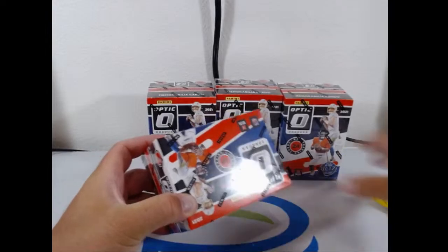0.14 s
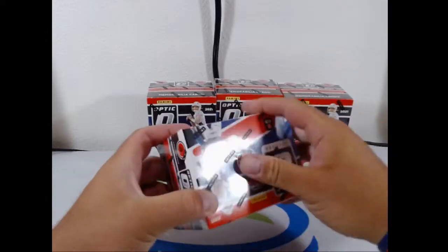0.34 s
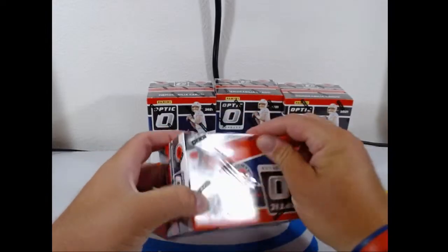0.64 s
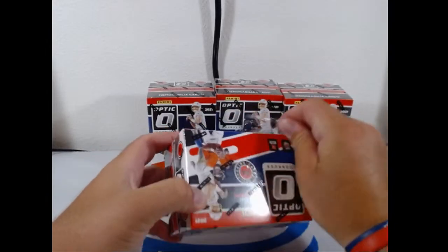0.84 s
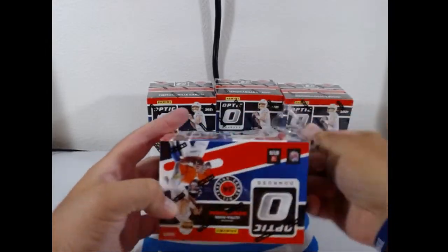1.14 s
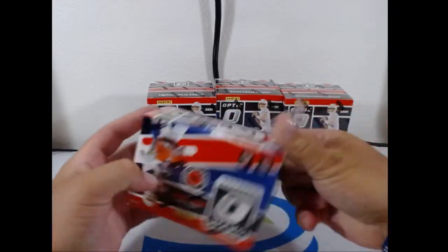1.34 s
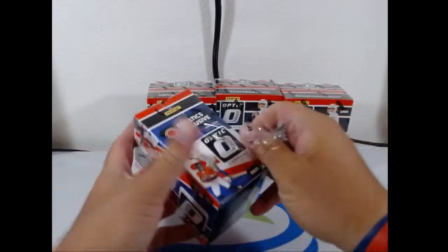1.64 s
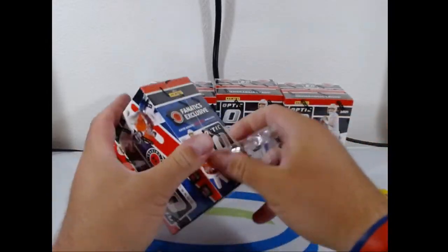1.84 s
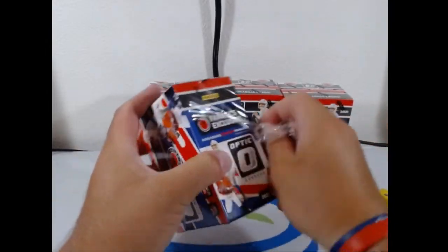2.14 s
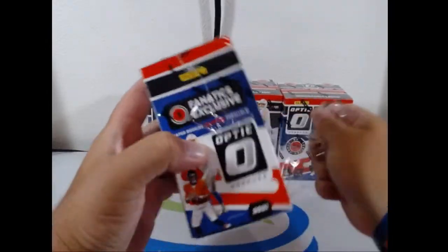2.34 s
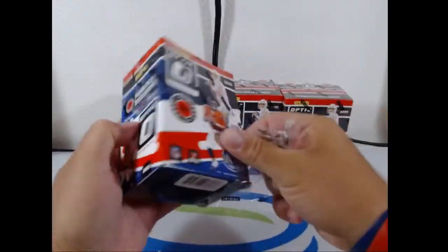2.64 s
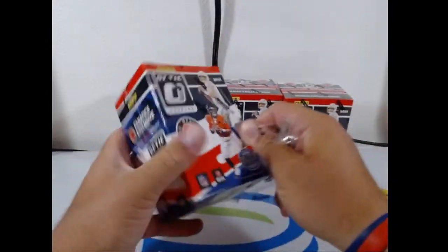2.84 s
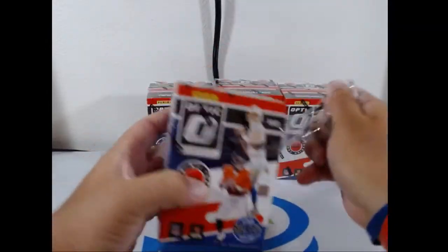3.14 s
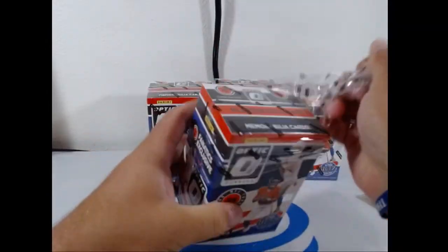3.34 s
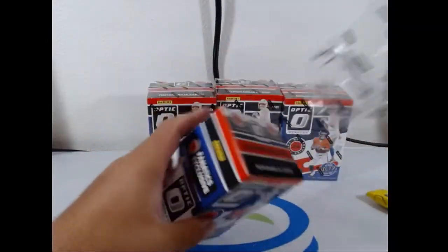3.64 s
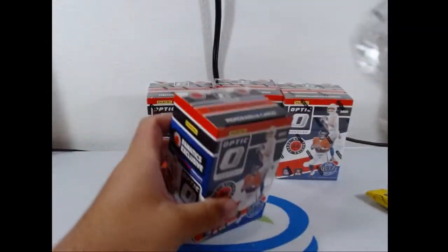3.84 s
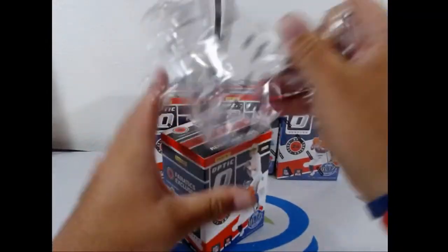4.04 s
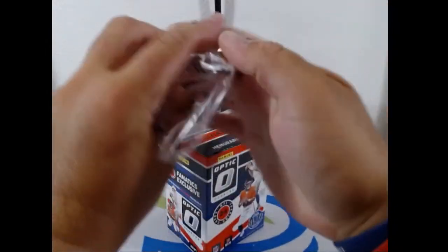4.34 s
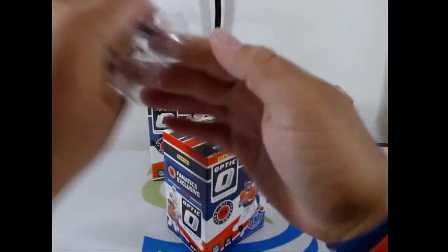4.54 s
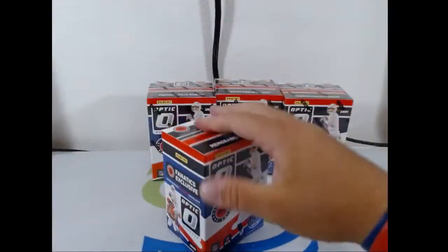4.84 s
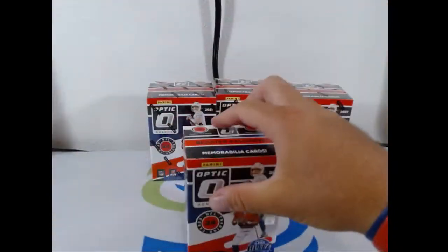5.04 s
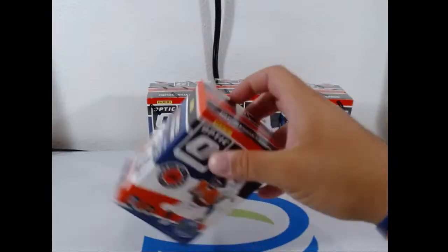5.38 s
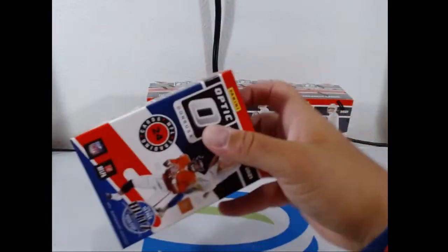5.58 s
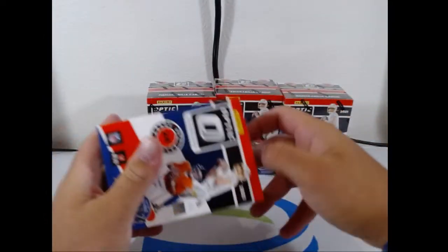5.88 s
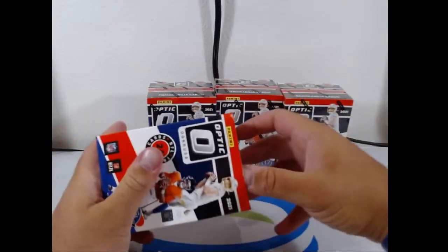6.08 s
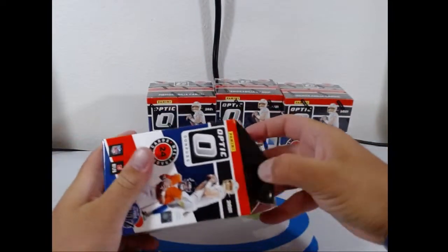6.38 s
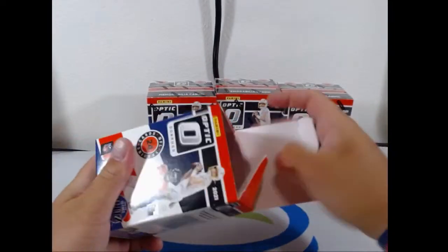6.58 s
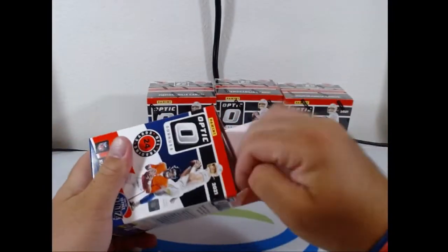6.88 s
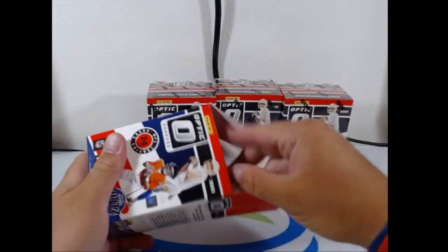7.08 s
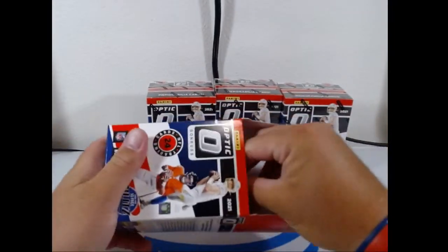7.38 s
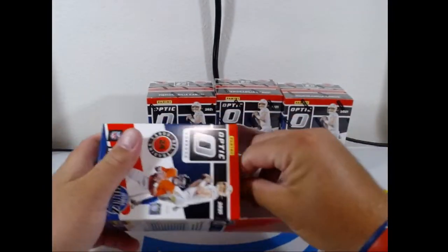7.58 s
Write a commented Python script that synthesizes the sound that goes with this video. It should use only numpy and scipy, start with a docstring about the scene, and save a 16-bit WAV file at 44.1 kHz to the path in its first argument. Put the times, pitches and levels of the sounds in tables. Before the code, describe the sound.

Close hands tear crackly wrap from a cardboard box, crumple it, set the box down and pull the flaps open with hollow knocks.

```python
"""Unwrapping a small cardboard box

Hands tear thin plastic wrap off a small cardboard box above a table, crumple it and open the flaps.
Film and card snap and crinkle: short noise bursts and thousands of tiny clicks, coloured by filters.
Fingers knock and brush the hollow box, and things land on the table: rough pushes and taps ring fading tones.
Mains hum and a wavering motor tone beat under the low rumble and faint hiss of the quiet room."""
import sys
import numpy as np
from scipy import signal
from scipy.fft import rfft, irfft
from scipy.io import wavfile
from scipy.ndimage import uniform_filter1d, map_coordinates

SR = 44100
rng = np.random.default_rng(int(sys.argv[2]) if len(sys.argv) > 2 else 0)


def persist_wave(psi):
    """Save psi, clipped to +-1, as 16-bit WAV."""
    counts = np.round(np.clip(psi, -1, 1) * 32767).astype(np.int16)
    wavfile.write(sys.argv[1], SR, np.atleast_2d(counts).T)


N = 340204  # length in samples


def gain_of(db):
    """Turns decibels into a gain."""
    return 10 ** (np.asarray(db) / 20)


def evened(x):
    """Scales a sound to an average (rms) strength of 1."""
    return x / np.sqrt(np.mean(x ** 2) + 1e-20)


def read(points, hz):
    """Reads a table of values by frequency, on a log-frequency axis."""
    f, value = np.transpose(points)
    return np.interp(np.log(hz + 1), np.log(f + 1), value)


def curve(rows, axis):
    """Draws one column of a timed table as a curve over all samples."""
    rows = np.array(rows)
    return np.interp(np.arange(N) / SR, rows[:, 0], rows[:, axis])


def add(mix, s, sound):
    """Mixes a sound in at a time in seconds."""
    part = mix[round(s * SR):][:len(sound)]
    part += sound[:len(part)]


def high_pass(x, hz, order=2):
    """Removes what lies below a frequency."""
    return signal.lfilter(*signal.butter(order, hz, "high", fs=SR), x)


def causal(db):
    """Makes a filter that answers at once (minimum phase) from dB gains on 1025 frequencies."""
    both_halves = np.r_[db, db[-2:0:-1]]
    log_gain = np.log(gain_of(np.maximum(both_halves, -100)))
    return np.fft.ifft(np.exp(np.conj(signal.hilbert(log_gain)))).real[:512]


def ring(modes, extra_db, sides=1, size=16000):
    """Sums the fading tones (modes) of a struck body; sides of +1 or -1 start each outward or inward."""
    t = np.arange(size) / SR
    hz, level_db, t60 = np.array(modes).T[:, :, None]
    fading = gain_of(level_db + extra_db[:, None] - 60 * t / t60)
    return np.dot(sides * np.ones(len(modes)), fading * np.sin(2 * np.pi * hz * t))


def sparse(per_s, spread_db):
    """Scatters random clicks of either sign, a few of them large."""
    size = gain_of(spread_db * np.minimum(rng.exponential(1, N), 4))
    size = size * rng.choice([-1., 1.], N)
    return size * (rng.random(N) < per_s / SR)


def drift(size):
    """Slow random wandering: noise smoothed twice over a number of samples."""
    smooth = uniform_filter1d(rng.standard_normal(N), size=size)
    return evened(uniform_filter1d(smooth, size=size))


def alike(first, other, hz):
    """Makes a second side that shares part of the first, by frequency as in the room air."""
    same = read(SAME, hz)[:, None]
    return np.array([first, same * first + np.sqrt(1 - same ** 2) * other])


# Steady hum tones. Each row: pitch in Hz, rms level in dB.
HUM_TONES = [(120.04, -45.5), (330, -67)]
MOTOR_HZ, MOTOR_WIDTH_HZ, MOTOR_DB = 114.9, 1.3, -47  # centre, width of the fuzz, rms level


def hum():
    """Steady hum tones and a fuzzy motor tone close below the lowest, so the two beat unevenly."""
    t = np.arange(N) / SR
    mains = sum(gain_of(db) * np.sin(2 * np.pi * hz * t) for hz, db in HUM_TONES)
    r = np.exp(-np.pi * MOTOR_WIDTH_HZ / SR)
    noise = rng.standard_normal(N) + 1j * rng.standard_normal(N)
    waver = signal.lfilter([1 - r], [1, -r], noise)
    motor = evened((waver * np.exp(2j * np.pi * MOTOR_HZ * t)).real)
    return np.sqrt(2) * mains + gain_of(MOTOR_DB) * motor


# Colour of the room air. Each row: frequency in Hz, relative level in dB per Hz.
AIR = [(12, -34.5), (25, 10), (60, -2.5), (105, -5), (160, -7.5), (230, -12.5), (300, -18), (400, -27.5),
       (1360, -32.5), (2300, -39.5), (6900, -54.5), (8400, -61), (9500, -104)]
AIR_DB = -49  # overall rms level
# Likeness of left and right. Each row: frequency in Hz, likeness from 0 (unrelated) to 1 (equal).
SAME = [(60, 1), (800, 0.89), (1500, 0.38), (4000, 0.2), (8000, 0.62)]


def air():
    """Low rumble and faint hiss of the room: noise shaped by frequency, partly shared by both sides."""
    frames, hz = N // 512 + 5, np.fft.rfftfreq(2048, 1 / SR)
    a, b, c, d = rng.standard_normal((frames, 1025, 4)).T
    spectra = alike(a + 1j * b, c + 1j * d, hz) * gain_of(read(AIR, hz))[:, None]
    noise = signal.istft(spectra, nperseg=2048, noverlap=1536)[1][:, :N]
    return gain_of(AIR_DB) * evened(noise)


# How fast the room dies away. Each row: frequency in Hz, time to fall 60 dB in seconds.
ROOM = [(200, 0.29), (1000, 0.2), (4000, 0.074), (8000, 0.12)]


def room(x):
    """Sparse reflections of random sign, the bass shared by both sides, each band dying at its own speed."""
    taps = np.zeros((2, SR // 2))
    slots = np.arange(60, SR // 2 - 20, 20)
    at = slots + rng.integers(0, 20, (2, len(slots)))
    np.put_along_axis(taps, at, rng.choice([-1., 1.], at.shape), 1)
    hz, t, z = signal.stft(taps, SR, nperseg=256)
    fading = gain_of(-60 * t / read(ROOM, hz)[:, None])
    tail = signal.istft(alike(z[0], z[1], hz) * fading, SR, nperseg=256)[1]
    return signal.fftconvolve(x[None], tail / np.linalg.norm(tail[0]), axes=1)[:, :N]


def nearby(x, size=1024):
    """Moving hands and box throw the treble back within milliseconds, differently at each side and moment."""
    treble = high_pass(x, 1150., order=4)
    out, fade = np.zeros((2, N + 2 * size)), signal.windows.hann(size, sym=False)
    for start in range(0, N - size // 2, size // 2):  # overlapping moments
        taps = np.zeros((2, 256))
        np.put_along_axis(taps, rng.integers(10, 256, (2, 10)), rng.choice([-1., 1.], (2, 10)), 1)
        taps *= np.exp(-np.arange(256) / 60.0)
        taps /= np.linalg.norm(taps, axis=1)[:, None]
        part = treble[start:start + size]
        echo = signal.fftconvolve((part * fade[:len(part)])[None], taps, axes=1)
        out[:, start:start + echo.shape[1]] += echo
    return out[:, :N]


# Pulls, squeezes and slides of the hands.
# Each row: start in seconds, length in seconds, crinkle level in dB, level of the box walls in dB.
STROKES = [(0.075, 0.062, -55, -49.5), (0.359, 0.026, -64.5, -45.5), (0.473, 0.03, -70, -56),
           (0.565, 0.0077, -63, -51.5), (0.636, 0.1, -59, -55), (0.863, 0.14, -58, -69),
           (1.015, 0.051, -55.5, -44), (1.097, 0.22, -56, -55), (1.418, 0.089, -53.5, -45),
           (1.625, 0.034, -66, -50), (1.726, 0.097, -59.5, -48.5), (1.89, 0.15, -63, -52.5),
           (2.146, 0.045, -51, -45.5), (2.29, 0.13, -55.5, -44), (2.614, 0.029, -65, -51),
           (2.694, 0.021, -57, -43.5), (3.021, 0.11, -49, -44), (3.264, 0.017, -58, -54.5),
           (3.426, 0.12, -58, -50.5), (3.591, 0.011, -41.5, -35), (3.654, 0.063, -56, -53),
           (4.011, 0.092, -68, -42), (4.175, 0.011, -54.5, -51), (4.275, 0.12, -51.5, -55.5),
           (4.486, 0.091, -51.5, -56), (4.633, 0.052, -64, -66), (4.845, 0.015, -56.5, -62),
           (4.888, 0.055, -74, -49.5), (5.059, 0.018, -64, -48), (5.3, 0.02, -65.5, -44.5),
           (5.738, 0.12, -67, -52), (6.033, 0.035, -65.5, -77), (6.086, 0.012, -56, -45.5),
           (6.314, 0.026, -66, -41.5), (6.393, 0.0099, -39.5, -32), (6.449, 0.041, -43, -38),
           (6.524, 0.017, -43, -39), (6.637, 0.13, -62, -55), (6.884, 0.078, -55, -46),
           (7.051, 0.041, -50.5, -48.5), (7.153, 0.17, -54.5, -43), (7.368, 0.059, -59, -62),
           (7.565, 0.25, -50, -40.5)]
# Faint rustle between the strokes.
# Each row: time in seconds, crinkle level in dB, level of the box walls in dB.
REST = [(0, -69, -53), (.3, -73.5, -65.5), (.9, -69, -58.5), (2.5, -65.5, -62), (2.9, -62, -56.5),
        (3.9, -64.5, -59.5), (4.8, -61, -72.5), (5.3, -73, -51.5), (5.5, -87.5, -78), (5.95, -74.5, -58),
        (6.8, -87, -64), (7.71, -62.5, -45)]
RISE_DB_PER_S, SAG_DB_PER_S, FALL_DB_PER_S = 610, 17, 259.5  # before, during and after a stroke


def handling(axis):
    """Level gain from the hands: each stroke rises, sags while held and falls, over the faint rustle."""
    t = np.arange(N // 64 + 2) * 64 / SR  # every 64 samples is fine enough
    rows = np.array(STROKES)
    since, length = t - rows[:, :1], rows[:, 1:2]
    db = rows[:, axis + 1, None] + RISE_DB_PER_S * np.minimum(since, 0)
    db = db - SAG_DB_PER_S * np.clip(since, 0, length)
    db = db - FALL_DB_PER_S * np.maximum(since - length, 0)
    power = np.interp(np.arange(N) / SR, t, (gain_of(db) ** 2).sum(0))
    return np.sqrt(power + gain_of(curve(REST, axis=axis)) ** 2)


# Tones of the hollow box. Each row: pitch in Hz, relative level in dB, time to fall 60 dB in seconds.
BOX = [(199.6, -5, 0.08), (245.5, 7.5, 0.025), (330.7, 0.5, 0.043), (403.4, -6.5, 0.075), (472, 1, 0.024),
       (517.2, -9.5, 0.083), (692, 2.5, 0.024), (782, 1.5, 0.036), (880, -5.5, 0.024), (880, -6, 0.048),
       (1007, -3.5, 0.034), (1230, -9.5, 0.011), (1540, -5, 0.014), (1950, -3.5, 0.0068),
       (2880, -10, 0.016)]


def walls():
    """Fingers sliding and film tugging tap the box walls many times a second."""
    out = np.zeros(N)
    tilt_db = 1.1 * np.log2(np.array(BOX)[:, 0] / 500)
    for spot, sides in rng.standard_normal((5, 2, len(BOX))):  # each spot on the walls favours other modes
        body = ring(BOX, tilt_db + 4.6 * spot, np.sign(sides), size=5000)
        out += signal.oaconvolve(sparse(per_s=290.0, spread_db=5.5), evened(body))[:N]
    return handling(axis=2) * evened(high_pass(out, 200.))


SETTLE_DB_PER_S = 895  # extra fade, by at most 16 dB, once the object rests and damps the ring


def blows(rows, modes, below, scatter_db, grit, even, scattered):
    """A short rough contact rings the modes near its centre most; where it lands varies each mode."""
    out, t = np.zeros(N), np.arange(1500) / SR
    mode_hz = np.array(modes)[:, :1]
    draws = rng.standard_normal((len(rows), len(t) + len(modes)))
    for (s, db, centre_hz, ms, *rest), draw in zip(rows, draws):
        width = rest[0] if rest else 0.62 * (736.0 / centre_hz) ** 0.45  # high taps ring few modes
        apart = np.log(mode_hz[:, 0] / centre_hz)
        near_db = -12.0 * (apart / np.where(apart < 0, below * width, width)) ** 2
        u = t * 1000 / max(ms, .2)
        push = u * np.exp(-2.5 * u) * (1 + grit * draw[:len(t)])
        reach = abs(np.exp(-2j * np.pi * mode_hz * t) @ push)  # how hard the contact drives each mode
        # even lessens how much the contact's own chance colours the ring
        near_db = np.maximum(near_db, -30.) - even * 20 * np.log10(reach / reach.max() + 0.011)
        sides = np.sign(draw[-len(modes) - 100:-100]) if scattered else 1
        body = ring(modes, near_db + scatter_db * draw[len(t):], sides)
        sound = signal.fftconvolve(push, body)
        sound = high_pass(sound, centre_hz * 0.37)  # a small body radiates no deep bass
        if rest:
            late = np.maximum(np.arange(len(sound)) / SR - rest[1] / 1000, 0)
            sound = sound * gain_of(np.maximum(-SETTLE_DB_PER_S * late, -16.))
        add(out, s, gain_of(db) * sound / abs(sound).max())
    return out


# Things set down on the table, first a tool, then the box.
# Each row: start in seconds, peak level in dB before the room and microphones,
# centre of the excited modes in Hz, time scale of the contact in ms,
# spread of the excited modes in log frequency, time in ms after which the ring is damped.
LANDINGS = [(.039, 1, 299, 0.9, 0.53, 240), (.046, -8.5, 106.5, 0.57, 0.65, 45.),
            (3.994, -10, 252, 0.83, 0.24, 34.), (4.070, -18.5, 254, 2.7, 0.31, 29),
            (4.892, -19.5, 255, 1.3, 0.27, 30)]
# Tones of the table top. Each row: pitch in Hz, relative level in dB, time to fall 60 dB in seconds.
TABLE = [(81, -9, 0.16), (119, -1.5, 0.16), (252.3, 0, 0.22), (266.2, 1.5, 0.2), (312, -6.5, 0.18),
         (331, 9.5, 0.055), (333, -15, 0.85), (380, 2.5, 0.051), (494, -13.5, 0.51), (770, -3, .05),
         (960, 10.5, 0.045), (1265, -7.5, 0.44), (1757, 4.5, 0.076)]


def landings():
    """Objects set down ring the table top, then damp it as they rest."""
    return blows(LANDINGS, TABLE, below=0.84, scatter_db=1.2, grit=0.8, even=1.0, scattered=False)


# Knocks on the box. Each row: start in seconds, peak level in dB before the room and microphones,
# centre of the excited modes in Hz, time scale of the contact in ms.
KNOCKS = [(0.043, -16.5, 910, 6.5), (0.326, -27.5, 760, 1.35), (0.336, -35, 750, 4),
          (0.371, -22.5, 640, 4.1), (0.396, -31.5, 420, 3.6), (0.445, -33, 630, 3), (0.608, -27, 664, 3.5),
          (0.908, -29.5, 850, 1.7), (0.976, -29, 396, 0.33), (1.042, -35, 790, 2.4),
          (1.054, -24, 590, 1.86), (1.094, -22.5, 640, 2.9), (1.149, -31, 850, 1.4),
          (1.403, -29.5, 443, 10), (1.445, -35, 820, 5.8), (1.647, -28, 750, 2.5), (2.162, -29.5, 706, 0.7),
          (2.238, -22, 526, 3.4), (2.247, -28, 620, 5.8), (2.343, -36, 810, 2.27), (2.608, -25.5, 386, 2.2),
          (2.648, -28, 484, 1.5), (2.973, -29, 411, 1.6), (3.024, -18.5, 375, 5.2),
          (3.088, -28.5, 860, 4.1), (3.245, -43, 780, 1.3), (3.275, -33, 464, 1.7), (3.45, -21, 463, 1.8),
          (3.587, -25.5, 433, 1.5), (3.61, -21, 453, 1.5), (3.706, -29.5, 455, 6.1), (3.999, -16, 745, 3.1),
          (4.016, -34, 780, 2.4), (4.885, -29, 620, 2.4), (4.926, -31.5, 760, 1.8),
          (5.011, -41.5, 835, 3.4), (5.056, -33.5, 640, 2.6), (5.057, -42, 2010, 3.5),
          (5.335, -44.5, 1850, 10.2), (5.264, -31.5, 710, 5), (5.271, -36, 2910, 1.7),
          (5.306, -31, 706, 1.3), (5.735, -34, 306, 1.4), (5.776, -27.5, 543, 2.6), (5.929, -37, 451, 6.2),
          (6.0765, -12, 516, 2.05), (6.164, -32, 497, 3.6), (6.299, -15.5, 516, 4.9),
          (6.383, -19, 516, 4.2), (6.41, -25.5, 480, 2.3), (6.449, -10.5, 570, 5.2), (6.545, -16, 400, 5.3),
          (6.644, -35, 690, 2.5), (6.762, -35, 443, 10.5), (6.974, -28.5, 855, 6.6), (7.131, -29, 428, 4.8),
          (7.166, -14.5, 635, 4.8), (7.187, -23, 240, 4.1), (7.251, -30, 980, 2.7), (7.274, -25, 463, 11),
          (7.368, -27.5, 935, 1.5), (7.382, -28.5, 1020, 4.9), (7.547, -36, 950, 2.8),
          (7.565, -16.5, 400, 8.4), (7.624, -24, 850, 4.2)]


def knocks():
    """Fingers knock the hollow box, and its walls ring outward or inward by chance."""
    return blows(KNOCKS, BOX, below=1.11, scatter_db=2.0, grit=3.23, even=0.88, scattered=True)


# Colour of the film. Each row: frequency in Hz, relative level in dB.
FILM = [(200, -23.5), (600, -5), (1200, -8.5), (2000, -6), (3000, -4), (4500, -5), (6000, -5), (7200, -6),
        (8000, -19), (8600, -21)]
# What rustles, film or card. Each row: time in seconds, share of card from 0 to 1.
CARD_SHARE = [(0, 0.77), (.5, 0), (4.85, 0), (5.0, 0), (6.2, 0.4), (6.35, 0.4), (6.6, 0.76), (7.0, 0.3),
              (7.08, 1), (7.71, 0.9)]


def crinkle():
    """Tiny buckles, clumped, each with its own colour; card lacks the high ones."""
    hz, out, card = np.fft.rfftfreq(2048, 1 / SR), np.zeros(N), curve(CARD_SHARE, axis=1)
    for centre_hz in np.geomspace(1100, 7500, num=8):
        bump = np.exp(-(np.log((hz + 1) / centre_hz) / 0.22) ** 2)
        colour = read(FILM, hz) + 12.0 * bump
        flurry_db = 0.63 * drift(400) * 1  # busy and quiet moments of this colour
        card_db = -8.2 * card * np.log2(centre_hz / 2500)
        grains = sparse(per_s=480.0, spread_db=3.5) * gain_of(flurry_db + card_db)
        out += signal.oaconvolve(grains, causal(colour))[:N]
    clumps = gain_of(1.3 * drift(150))
    return handling(axis=1) * evened(out * clumps)


def clicky(ms):
    """Swell and quick die-away of one snap, over 1200 samples; strongest at 0.56 of its time scale."""
    u = np.arange(1200) / SR * 1000 / max(ms, .3)
    return u * np.exp(-1.8 * u)


TICKS_PER_S, TICKS_DB, TICK_MS = 120., -2, 0.3  # rate, level against the crinkle, time scale


def ticks():
    """Small sharp snaps across the whole band, as strong as the hands are busy."""
    out, colour = np.zeros(N), causal(read(FILM, np.fft.rfftfreq(2048, 1 / SR)))
    swell = clicky(TICK_MS)[:300]
    for burst in rng.standard_normal((6, len(swell))) * swell:  # six different snap shapes
        clicks = sparse(per_s=TICKS_PER_S / 6, spread_db=4.0)
        out += signal.oaconvolve(clicks, np.convolve(burst, colour))[:N]
    return gain_of(TICKS_DB) * handling(axis=1) * evened(out)


# Loud snaps of film and card edges.
# Each row: start in seconds, short-time peak level in dB before the room and microphones,
# brightness (plus lifts the treble, minus the lows; scaled below), time scale in ms (0.3 at least).
SNAPS = [(0.0394, -26, -1, 5.5), (0.056, -33.5, -3.5, 4.6), (0.3263, -46.5, -14, 0.84),
         (0.3761, -39.5, -18, 3.2), (0.448, -36.5, 4, 1.02), (0.494, -52, 5, 1.5), (0.5505, -38, -5, 1.1),
         (0.557, -28, 31, 0.64), (0.6105, -35, 2, 1.4), (0.642, -40.5, 7, 0.84), (0.6652, -42.5, -4, 0.56),
         (0.686, -38, -7, 2.7), (0.724, -36.5, 10.5, 1.3), (0.8735, -39, -4, 1.1), (0.891, -40.5, -5, 1.8),
         (0.9416, -45.5, 9, 0.87), (0.9751, -37.5, -9, 5.5), (1.027, -48, -4, 1.4), (1.042, -41, -5, 1.3),
         (1.0551, -34.5, -0.5, 4.5), (1.095, -20.5, 8.5, 0.84), (1.125, -42, 4.5, 1),
         (1.137, -37.5, 8, 0.66), (1.2287, -40.5, 7, 0.74), (1.31, -38, -3, 0.43),
         (1.338, -44.5, -9.5, 5.2), (1.448, -39.5, -13, 2.3), (1.5, -41.5, 3, 1.9),
         (1.513, -44.5, -4, 0.88), (1.558, -40, -6, 1.7), (1.587, -36, -2, 0.74), (1.606, -44, 3, 0.89),
         (1.646, -38, -17, 0.73), (1.652, -42, 2, 4.2), (1.7, -46.5, 10, 0.96), (1.7186, -50, -5, 0.9),
         (1.745, -54, 23, 0.9), (1.7672, -43, 3, 0.79), (1.8052, -34.5, 2, 0.9), (1.876, -43.5, -11, 0.86),
         (1.969, -39, 5, 0.84), (1.9775, -33.5, 9, 0.81), (2.133, -40, -8, 0.98), (2.1412, -29.5, -11, 2.4),
         (2.1583, -21.5, 9.5, 1.8), (2.1908, -42, 0, 2.2), (2.2364, -17, -9, 0.2),
         (2.2417, -34.5, -14.5, 4.2), (2.249, -41.5, 1, 2.2), (2.305, -50, 3, 1.2), (2.336, -35, -4, 0.52),
         (2.408, -51, 7, 0.93), (2.441, -38.5, 6.5, 0.43), (2.6055, -36.5, -20, 1.6),
         (2.685, -35, -36, 1.1), (2.936, -37, -24, 0.99), (2.976, -25, 7.5, 1.3), (3.0143, -25, 4.5, 0.98),
         (3.0251, -17, 0.5, 2.7), (3.113, -40, 11, 0.96), (3.123, -41.5, -14.5, 0.8),
         (3.1324, -38.5, -25, 1.9), (3.161, -37.5, -11.5, 1.3), (3.4529, -18.5, 2.5, 0.35),
         (3.5808, -21.5, 7, 0.64), (3.5883, -13, -8.5, 0.91), (3.602, -18, 3, 4.5),
         (3.997, -38.5, -3.5, 2.2), (4.0008, -34.5, -24, 4.4), (4.072, -48.5, -11, 3),
         (4.178, -43.5, -3, 1.5), (4.2835, -40.5, 17, 1.3), (4.523, -43.5, 9, 1.2),
         (4.699, -48, -8.5, 0.95), (5.308, -44, -12.5, 1.6), (5.446, -59.5, -24, 2.1),
         (5.5323, -54, -24, 2.7), (5.7787, -38.5, -23, 1.5), (5.8467, -43, -21, 3.3), (5.93, -52, -21, 5.7),
         (6.0767, -27, -19, 0.58), (6.167, -44, -20, 2.2), (6.207, -47.5, 3, 0.71),
         (6.2991, -18.5, 3, 0.83), (6.3395, -38.5, 4.5, 1.6), (6.3898, -25, 10, 1.4),
         (6.4092, -32, 3.5, 3.6), (6.4516, -13.5, -9, 1.04), (6.5432, -25, 11.5, 1.5),
         (6.5482, -24, -14.5, 0.83), (6.6426, -34, -38, 4.9), (6.7611, -39.5, -28, 3.5),
         (7.0986, -35, 25, 2.2), (7.132, -29.5, 6, 0.84), (7.1721, -32, -8, 1.4), (7.1858, -34.5, -10, 1.5),
         (7.2886, -38, 3, 2), (7.367, -39.5, 1.5, 0.79), (7.5115, -40, -5, 1.4), (7.5452, -39.5, 3, 2.1),
         (7.5638, -30.5, -12.5, 5.3)]


def snaps():
    """Each snap is a short burst of sharp clicks that swell and die fast, in the film's colour."""
    hz, out = np.fft.rfftfreq(2048, 1 / SR), np.zeros(N)
    draws = rng.standard_normal((len(SNAPS), 2, 1200))
    for (s, db, brightness, ms), (noise, slips) in zip(SNAPS, draws):
        burst = noise * gain_of(1.1 * slips) * clicky(ms)  # uneven slips
        slope_db = brightness * 0.64 * np.tanh(np.log((hz + 1) / 4300) / 0.94)
        # each crease favours its own bands
        slope_db += 1.9 * np.sin(hz / 300.0 + 2 * np.pi * noise[0])
        sound = signal.fftconvolve(burst, causal(read(FILM, hz) + slope_db))
        power = uniform_filter1d(sound ** 2, size=40).max()
        add(out, s, gain_of(db) * sound / np.sqrt(power))
    return out


# The hands move across the view.
# Each row: time in seconds, ms by which their sound reaches the left microphone later.
LEFT_LATE = [(0, 0.066), (1.6, -0.00055), (3.6, 0.039), (4.7, -0.028), (6.2, 0.0069)]


def scene():
    """Near sources reach the two sides a moment apart; close reflections and the room follow."""
    film = crinkle() + ticks() + snaps()
    body = knocks() + landings() + walls()
    near = film + body
    left = map_coordinates(near, [np.arange(N) - curve(LEFT_LATE, axis=1) * SR / 1000], order=3)
    direct = np.array([left, near]) + gain_of(-0.5) * nearby(near)
    reflected = room(gain_of(-6.5) * film + gain_of(-12.5) * body)
    return direct + reflected + hum() + air()


# Level difference of the microphones. Each row: frequency in Hz, left minus right in dB.
LEFT_DB = [(30, 5.5), (100, 1.4), (300, 1.5), (1000, 1.1), (2500, 0.5), (6000, 1.5)]
# Phase difference of the microphones. Each row: frequency in Hz, radians the left one lags.
LEFT_LAG = [(45, .42), (115, .19), (300, .12), (1000, 0)]
EDGE_HZ = 8586  # upper band limit


def record(dry):
    """Two slightly unlike microphones, soft overload that rounds the loudest peaks, then the band limit."""
    hz = np.fft.rfftfreq(N, 1 / SR)
    lean = gain_of(read(LEFT_DB, hz) / 2) * np.exp(-.5j * read(LEFT_LAG, hz))  # half to each side
    tilted = irfft(rfft(dry) * [lean, 1 / lean], N)
    rounded = 1.5 * np.tanh(tilted / 1.5)
    low_pass = signal.firwin(255, EDGE_HZ, window=("kaiser", 7), fs=SR)
    return signal.oaconvolve(rounded, low_pass[None], "same")


dry = scene()
out = record(dry)
persist_wave(out)
```